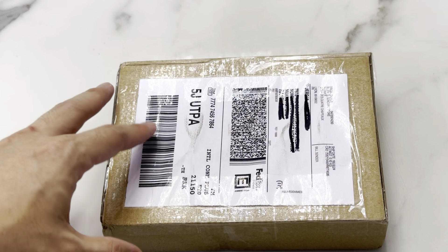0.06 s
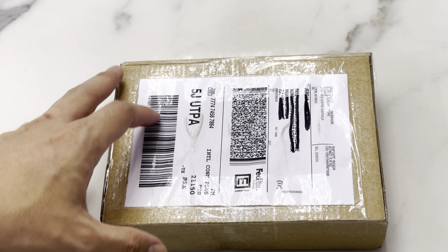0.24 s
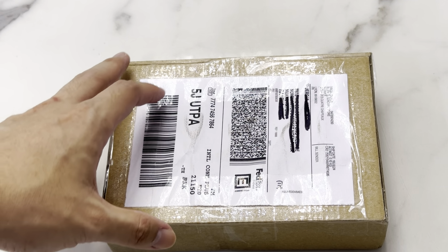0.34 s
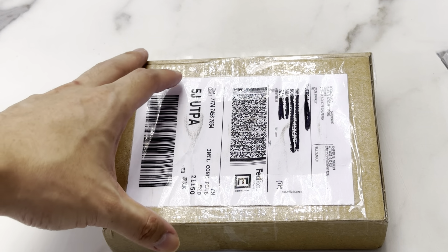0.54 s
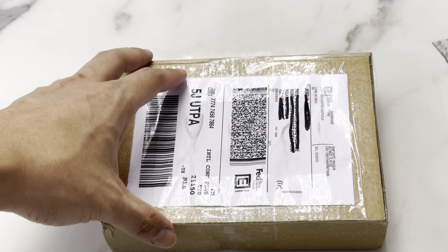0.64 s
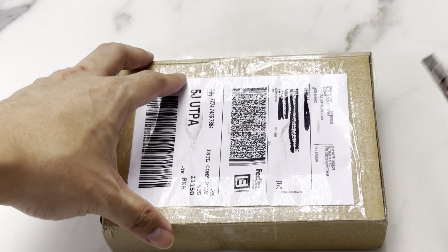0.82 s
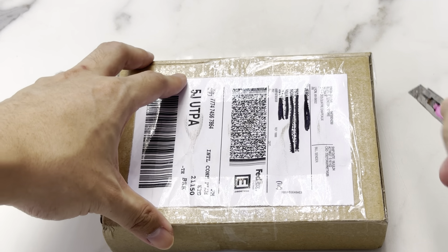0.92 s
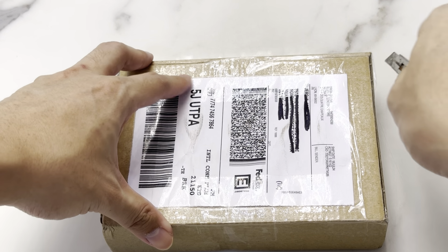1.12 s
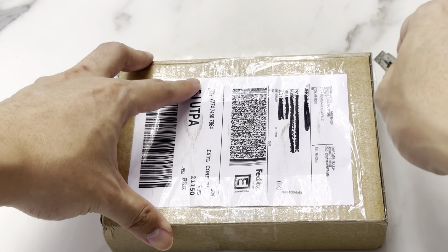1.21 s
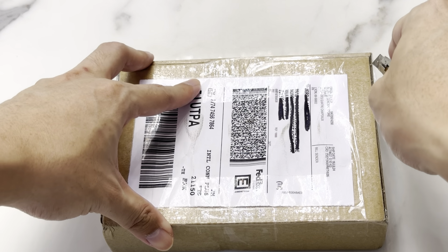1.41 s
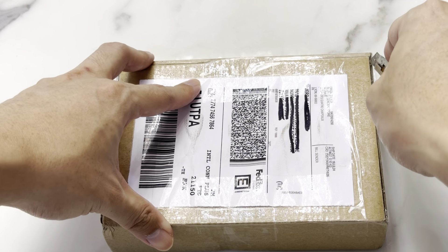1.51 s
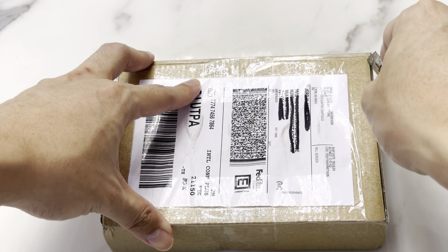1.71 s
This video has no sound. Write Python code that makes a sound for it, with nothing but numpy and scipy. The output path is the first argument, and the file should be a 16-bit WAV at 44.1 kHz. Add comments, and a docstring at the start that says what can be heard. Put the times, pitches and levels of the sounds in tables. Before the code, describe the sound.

Close to the microphone in a quiet room, a box cutter ratchets open with rapid, crisp clicks and metallic chatter. The slider settles after a soft bump, then a hand and the blade tip lightly tick against taped cardboard.

```python
"""A small, quiet room: close to a phone, a utility cutter's blade is pushed out over a cardboard parcel.
The slider snaps over twelve ratchet teeth and chatters between them; the freed steel blade knocks
and rings. A soft thump comes just before the last blade knocks and the slider settling back;
a few light ticks follow as the hand steadies the box and the tip meets it.
Underneath lie room rumble, rustling hands and faint gliding tones."""
import sys
import numpy as np
from scipy import signal
from scipy.fft import rfft, irfft, next_fast_len
from scipy.io import wavfile
from scipy.ndimage import uniform_filter1d

SR = 44100
rng = np.random.default_rng(int(sys.argv[2]) if len(sys.argv) > 2 else 0)


def unload_wav(signal):
    """Save mono or channel-first audio to the path in sys.argv[1] as 16-bit WAV at rate SR, clipped to [-1, 1]."""
    wavfile.write(
        sys.argv[1],
        SR,
        np.round(np.clip(np.atleast_2d(signal).T, -1, 1) * 32767).astype(np.int16),
    )


N = 77175
T = np.arange(N) / SR
HIT_GAIN_DB = 9  # added to every touch, press, knock and tooth


def undb(db):
    return 10 ** (np.asarray(db) / 20)


def unit(x):
    """Scale to unit energy."""
    return x / np.sqrt(np.sum(x ** 2))


def steady(x):
    """Scale to unit rms."""
    return x / np.std(x)


def fader(levels):
    """Gain that rides through (time_s, level_db) points."""
    return undb(np.interp(T, *np.array(levels).T))


def fade(t60_s):
    """Exponential decay that loses 60 dB in t60_s."""
    return np.exp(-np.log(1000) * T / t60_s)


def add(out, start_s, x):
    """Mix a sound in at its cue."""
    i = int(start_s * SR)
    out[i:i + len(x)] += x[:N - i]


def convolve(x, response):
    """Pass a sound through a response."""
    return signal.fftconvolve(x, response)[:len(x)]


def colour(x, eq, size=4096):
    """Minimum-phase EQ through (freq_hz, gain_db) points."""
    hz, db = np.array(eq, float).T
    bins_hz = np.arange(size // 2 + 1) * SR / size
    gain_db = np.interp(np.log(bins_hz + 1), np.log(hz), db)
    cepstrum = irfft(np.log(undb(gain_db)))
    cepstrum[1:size // 2] *= 2
    cepstrum[size // 2 + 1:] = 0
    return convolve(x, irfft(np.exp(rfft(cepstrum))))


def resonate(x, db, hz, width_hz):
    """Lift or damp one resonance."""
    band = signal.lfilter(*signal.iirpeak(hz, hz / width_hz, fs=SR), x)
    return x + (undb(db) - 1) * band


def ring(hz, t60_s, rise_s=.00025, size=8192):
    """One struck mode of unit energy, with a slightly rounded attack."""
    t = T[:size]
    attack = 1 - np.exp(-(t / rise_s) ** 2)
    return unit(attack * fade(t60_s)[:size] * np.sin(2 * np.pi * hz * t))


def contact(hold_s, eq, rise_s=.00015, fall_s=.00048, size=8192):
    """A gritty contact of unit energy: a short noise burst, its spectrum evened out before the EQ."""
    t = T[:size]
    envelope = (1 - np.exp(-t / rise_s)) * np.exp(-np.maximum(t - hold_s, 0) / fall_s)
    burst = envelope * np.sign(rng.standard_normal(size))
    spectrum = rfft(np.roll(burst, 16))
    smooth_power = uniform_filter1d(np.abs(spectrum) ** 2, size=200)
    even = irfft(spectrum / np.sqrt(smooth_power))
    trimmed = np.roll(even, -12)[:size - 256]  # drop the pre-ring that wraps round to the end
    return unit(colour(trimmed, eq))


def wash(eq, levels):
    """Soft noise of one colour on a slow fader."""
    return steady(colour(rng.standard_normal(N), eq)) * fader(levels)


def glide(path, waver_hz):
    """An unsteady tone: a narrow noise band sliding along (time_s, pitch_hz, level_db) points."""
    times, hz, db = np.array(path).T
    noise = rng.standard_normal(N) + 1j * rng.standard_normal(N)
    waver = steady(signal.sosfilt(signal.butter(2, waver_hz, fs=SR, output="sos"), noise))
    phase = 2 * np.pi * np.cumsum(np.interp(T, times, hz)) / SR
    tone = np.real(waver * np.exp(1j * phase))
    sounding = (T > times[0]) & (T < times[-1])
    soft_gate = uniform_filter1d(1. * sounding, size=1024)
    return steady(tone) * soft_gate * undb(np.interp(T, times, db))


# Colour of the room tone: freq_hz, gain_db
ROOM_TONE_EQ = [(20, -27), (32, -11), (50, 9.5), (85, -4), (170, -6.5), (330, -17), (600, -23.5),
                (1100, -34.5), (3500, -37.5), (6000, -43.5), (8000, -31.5), (10800, -31), (15000, -34.5)]
# Its fader: time_s, level_db
ROOM_TONE_LEVEL = [(0, -66), (.25, -64.5), (1.0, -65), (1.75, -64)]
def room_tone():
    """The bed: a low rumble with a faint high hiss."""
    return wash(ROOM_TONE_EQ, ROOM_TONE_LEVEL)


# Path of the hum: time_s, pitch_hz, level_db
HUM_PATH = [(.9, 532, -77), (.99, 641, -73.5), (1.1, 787, -87)]
def hum():
    """A faint, brief tone that rises as it fades."""
    return glide(HUM_PATH, waver_hz=18.6)


# Path of the whistle: time_s, pitch_hz, level_db
WHISTLE_PATH = [(.97, 10170, -78), (1.05, 10170, -75), (1.13, 11570, -72.5), (1.22, 11200, -73.5),
                (1.32, 12030, -72), (1.39, 11820, -72.5), (1.47, 10150, -75.5), (1.65, 8550, -76.5)]
# Its partials: pitch_ratio, gain_db
WHISTLE_STACK = [(1, 0), (.955, -5), (.91, -6), (.76, -10), (1.16, -10)]
def whistle():
    """Thin, high partials that rise and fall together."""
    return sum(undb(db) * glide(np.array(WHISTLE_PATH) * [1, ratio, 1], waver_hz=38)
               for ratio, db in WHISTLE_STACK)


# Low rustle of the hands: freq_hz, gain_db
RUSTLE_EQ = [(30, -23), (90, -1.5), (150, 7.5), (230, -2.5), (340, 1), (600, -22.5), (1200, -34),
             (4000, -41)]
# Its fader: time_s, level_db
RUSTLE_LEVEL = [(0, -94.5), (0.302, -70), (.52, -60.5), (.68, -69.5), (.82, -65.5), (1.2, -68.5),
                (1.45, -65.5), (1.75, -72)]
# Crisp colour of the tape: freq_hz, gain_db
TAPE_EQ = [(200, -30), (2400, -29), (3500, -20), (4400, -21), (5400, -1), (8200, 4.5), (11200, 8),
           (12600, -7), (14000, -5), (15800, -19)]
# Fingertips brushing it: time_s, level_db
FINGERTIP_LEVEL = [(0, -67.5), (.15, -69), (.3, -63.5), (.95, -73), (1.051, -89), (1.55, -89),
                   (1.75, -69.5)]
# Dull colour of the cardboard: freq_hz, gain_db
CARDBOARD_EQ = [(60, -12), (200, -1), (330, 11), (450, 2), (650, 1), (950, -8), (1500, -7), (2500, -18),
                (15000, -44)]
# The palm rubbing it: time_s, level_db
PALM_RUB_LEVEL = [(1.0, -94.5), (1.15, -76), (1.25, -82), (1.32, -74), (1.39, -75), (1.499, -90)]
def hands():
    """Moving hands rustle and rub softly over tape and cardboard."""
    rustle = wash(RUSTLE_EQ, RUSTLE_LEVEL)
    fingertips = wash(TAPE_EQ, FINGERTIP_LEVEL)
    palm = wash(CARDBOARD_EQ, PALM_RUB_LEVEL)
    return rustle + fingertips + palm


# Fingers and tip touching the taped box: start_s, level_db, contact_s
TAPE_TICKS = [(0.0675, -39.5, 0.0014), (.203, -42, 0.016), (1.171, -47.5, 0.022), (1.502, -41.5, 0.0042),
              (1.5072, -32.5, 0.0033), (1.567, -44, 0.0025), (1.5837, -34.5, 0.004),
              (1.6697, -25.5, 0.0028), (1.674, -34, 0.02)]
# The box giving under hand and tip: start_s, level_db, contact_s
BOX_PRESSES = [(1.566, -59, 0.0085), (1.653, -41, 0.0456)]
def parcel():
    """Light ticks on the tape and dull crunches of the cardboard."""
    out = np.zeros(N)
    for cues, eq in ((TAPE_TICKS, TAPE_EQ), (BOX_PRESSES, CARDBOARD_EQ)):
        for start_s, level_db, contact_s in cues:
            add(out, start_s, undb(HIT_GAIN_DB + level_db) * contact(contact_s, eq))
    return out


def thump(start_s=.7698, level_db=-43.5, rise_s=.005, from_hz=560, to_hz=205, sag_s=.003):
    """One soft, quickly damped bump of the box that sinks in pitch."""
    out = np.zeros(N)
    pitch_hz = to_hz + (from_hz - to_hz) * np.exp(-T / sag_s)
    push = T / rise_s
    envelope = push * np.exp((1 - push ** 2) / 2)
    tone = np.sin(2 * np.pi * np.cumsum(pitch_hz) / SR)
    add(out, start_s, undb(level_db) * envelope * tone)
    return out


# Bright colour of the cutter's body: freq_hz, gain_db
CUTTER_EQ = [(150, -34.5), (900, -32), (1900, -37.5), (2500, -13.5), (3700, -19.5), (4600, -17), (5900, -6),
             (6900, -16.5), (7800, -1), (8900, -9), (10400, 1.5), (11400, -4), (12700, -1.5), (14000, -7),
             (15800, -16)]
# Dull rasp in the plastic handle: freq_hz, gain_db
RASP_EQ = [(150, -8), (550, 5.5), (900, -10.5), (1400, 3), (2200, -2.5), (4000, -16.5)]
# Sliding effort: time_s, level_db
SLIDE_LEVEL = [(.238, -59.5), (.248, -45), (.272, -36), (.305, -58), (.35, -46), (.49, -41.5), (.55, -38),
               (.69, -38.5), (.73, -58)]
def slider(chatter_per_s=260, scatter_db=5.5, rub_db=-14, rasp_db=-24.5):
    """The moving slider rubs and chatters in tiny random contacts, rasping in the handle."""
    hits = rng.random(N) < chatter_per_s / SR
    strength = undb(scatter_db * np.clip(rng.standard_normal(N), -1.5, 1.5))
    chatter = steady(convolve(hits * strength, fade(t60_s=.005)) * rng.standard_normal(N))
    friction = chatter + undb(rub_db) * rng.standard_normal(N)
    scrape = steady(colour(friction, CUTTER_EQ))
    rasp = undb(rasp_db) * steady(colour(friction, RASP_EQ))
    moving = (T > SLIDE_LEVEL[0][0]) & (T < SLIDE_LEVEL[-1][0])
    return (scrape + rasp) * moving * fader(SLIDE_LEVEL)


# The loose blade hitting its track: start_s, level_db, contact_s, ring_db
BLADE_KNOCKS = [(0.2616, -16.5, .001, -32), (0.38, -16, .0015, -22.5), (0.4265, -23, .0006, -28),
                (.44, -20, .003, -18), (0.4613, -21.5, .001, -20.5), (0.4667, -19, .0015, -17.5),
                (0.5066, -20.5, .003, -6), (0.539, -19.5, .003, -7), (.549, -16.5, .0015, -18.5),
                (0.5658, -15.5, .003, -14), (0.6, -11.5, .0012, -21), (0.6138, -19, .0007, -22),
                (0.636, -17, 0.0012, -2), (0.6742, -16.5, .002, -1.5), (.677, -23, .004, 7),
                (.682, -16.5, .003, -2.5), (0.7991, -21, .003, 0.5), (0.8761, -14, .0012, -6.5)]
# Steely colour of a knock: freq_hz, gain_db
STEEL_EQ = [(150, -46), (1700, -44), (2600, -17), (4100, -25), (5300, -8), (6600, -5), (8000, -2),
            (10200, 2), (12700, -4), (15800, -12)]
# Modes of the freed blade: pitch_hz, level_db, t60_s
BLADE_MODES = [(5350, -15, .025), (6540, 0, .025), (7430, -14, .05), (10350, -11, .03)]
def blade(max_detune=.008):
    """The blade knocks in its track and rings, louder once it is out, each ring slightly detuned."""
    knocks, rings = np.zeros(N), np.zeros(N)
    detunes = rng.uniform(-max_detune, max_detune, len(BLADE_KNOCKS))
    for (start_s, level_db, contact_s, ring_db), detune in zip(BLADE_KNOCKS, detunes):
        gain = undb(HIT_GAIN_DB + level_db)
        modes = unit(sum(undb(db) * ring(hz * (1 + detune), t60_s) for hz, db, t60_s in BLADE_MODES))
        add(knocks, start_s, gain * contact(contact_s, STEEL_EQ))
        add(rings, start_s, gain * undb(ring_db) * modes)
    return knocks, rings


# Twelve teeth, then the slider settling back:
# start_s, level_db, contact_s, spring_hz, spring_db, hollow_db, track_db, bright_db
RATCHET_SNAPS = [(0.2378, -2.5, .0012, 7700, -4, -8, -10.5, -1),
                 (0.2716, -3.5, 0.002, 7700, -3.5, -4, -1, -5), (0.32, -6, 0.0014, 7830, 5, -1, 0.5, 1.5),
                 (0.3678, -3.5, 0.0021, 7660, -1, -8, 3, -0.5),
                 (0.4085, -4, 0.0011, 7250, -12, -4.5, 0.5, -1),
                 (0.4546, -4.5, 0.0017, 8000, -19.5, -2, 4.5, 2),
                 (0.4992, -4, 0.0014, 8530, -7.5, -1, -1.5, -4),
                 (0.5337, -3.5, 0.0018, 7760, -12, 0.5, 4.5, -3),
                 (0.562, -2.5, .0011, 8200, -2.5, 1, 1.5, -9), (0.5974, -6, .001, 8300, 2, 4.5, 0.5, -7),
                 (0.6322, -5.5, .001, 7800, -4, 6.5, -2, -8),
                 (0.6695, -6.5, 0.0018, 7500, 2.5, 12, 1.5, -3.5),
                 (0.8073, -11.5, .0042, 7400, -8.5, 2, 3.5, -2)]
# Dull knock of the handle's shell, fuller as the thumb bears down: time_s, gain_db
SHELL_GAIN = [(.24, -8), (.45, 0.5)]
def ratchet(spring_trim_db=-5.5):
    """Each tooth snaps the slider's spring against the track and sounds the hollow handle."""
    out = np.zeros(N)
    for start_s, level_db, contact_s, spring_hz, spring_db, *resonances_db in RATCHET_SNAPS:
        hollow_db, track_db, bright_db = resonances_db
        shell_db = np.interp(start_s, *np.array(SHELL_GAIN).T)
        snap = contact(contact_s, CUTTER_EQ)
        snap = resonate(snap, hollow_db, hz=2496, width_hz=850)
        snap = resonate(snap, shell_db, hz=798, width_hz=420)
        snap = resonate(snap, track_db, hz=5600, width_hz=870)
        snap = resonate(snap, bright_db, hz=11890, width_hz=5700)
        spring = undb(spring_trim_db + spring_db) * ring(spring_hz, t60_s=.007)
        gain = undb(HIT_GAIN_DB + level_db)
        add(out, start_s, gain * snap)
        add(out, start_s + contact_s / 2, gain * spring)
    return out


# Colour of the reverb return: freq_hz, gain_db
REVERB_EQ = [(200, 4), (900, -5), (1700, -2.5), (2600, -5), (4000, -5.5), (6500, -8.5), (7800, -5),
             (11000, -6.5), (15000, -9)]
def reverb(send, delay_s=.00084, early_db=-4, tail_db=-12.5):
    """Quick reflections from table and box, then the room's short tail."""
    onset = np.clip(T / delay_s - .5, 0, 1)
    early = undb(early_db) * unit(onset * fade(t60_s=.18) * rng.standard_normal(N))
    tail = undb(tail_db) * unit(onset * fade(t60_s=.52) * rng.standard_normal(N))
    return colour(convolve(send, early + tail), REVERB_EQ)


# Stereo width, as EQ on the side channel: freq_hz, gain_db
SIDE_EQ = [(30, -14), (60, -7), (250, -9), (550, -3), (1200, -1), (2600, -5), (8500, -8)]
def scene(thump_send_db=-10, ring_send_db=-6):
    """Cutter and parcel sit in the centre; reverb, room tone and hands add a little width."""
    snaps = ratchet()
    knocks, rings = blade()
    foley = snaps + knocks + slider() + parcel()
    bump = thump()
    send = foley + undb(thump_send_db) * bump + undb(ring_send_db) * rings
    mid = foley + bump + rings + reverb(send) + room_tone() + hands() + whistle() + hum()
    side = colour(reverb(send) + (room_tone() + hands()) / 2, SIDE_EQ)
    return np.array([mid + side, mid - side])


def record(dry, split_hz=7880, lag_s=.000317, top_hz=15900):
    """The phone's left port hears the high treble late; a steep low-pass cuts the top of both sides."""
    size = next_fast_len(2 * N)
    hz = np.arange(size // 2 + 1) * SR / size
    treble_lag = np.exp(-2j * np.pi * np.maximum(hz - split_hz, 0) * lag_s)
    left = irfft(rfft(dry[0], size) * treble_lag, size)[:N]
    low_pass = signal.ellip(8, .2, 80, top_hz, fs=SR, output="sos")
    return signal.sosfilt(low_pass, np.array([left, dry[1]]))


dry = scene()
out = record(dry)
unload_wav(out)
```